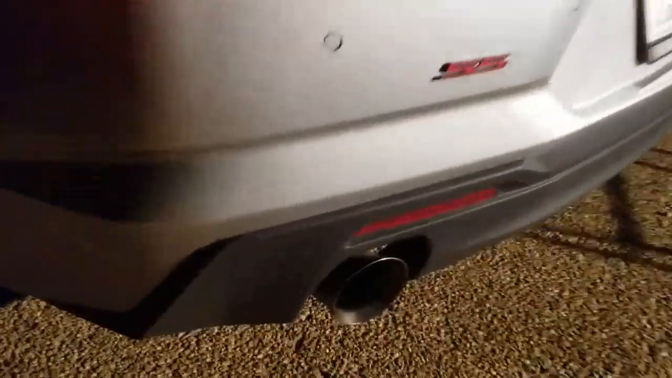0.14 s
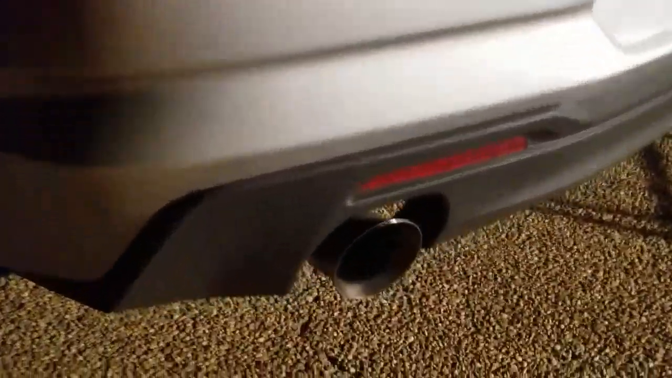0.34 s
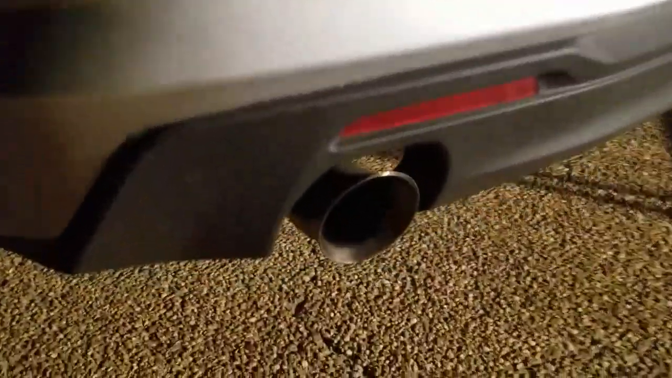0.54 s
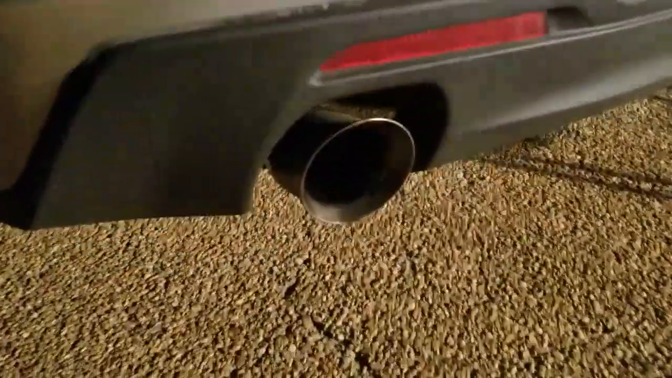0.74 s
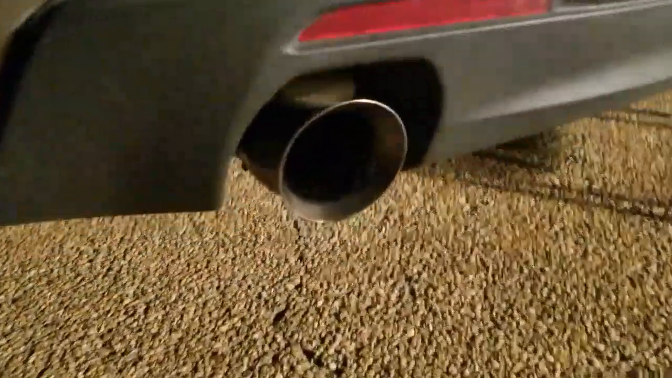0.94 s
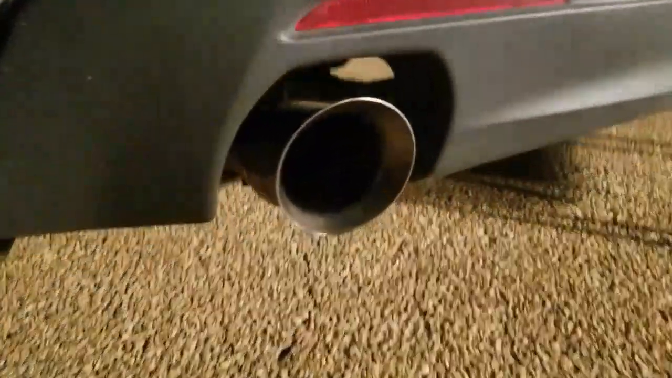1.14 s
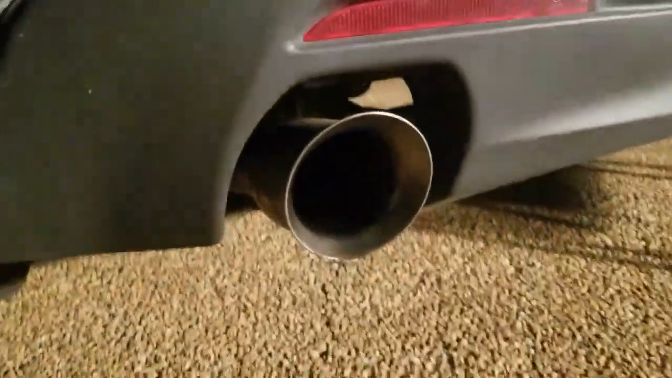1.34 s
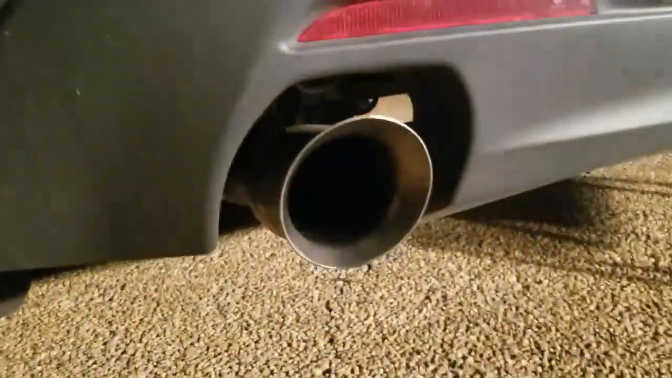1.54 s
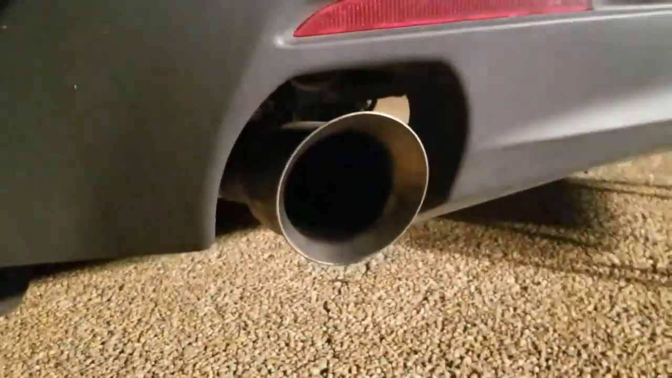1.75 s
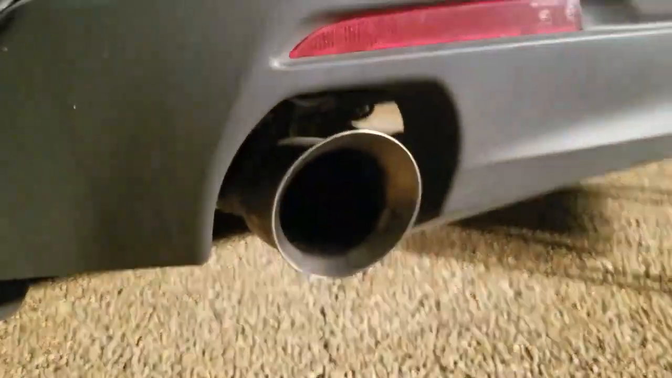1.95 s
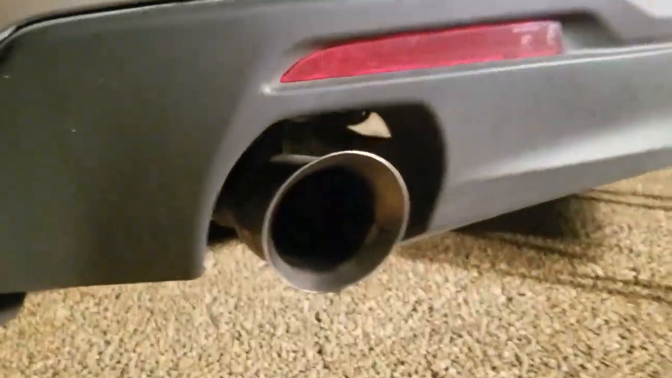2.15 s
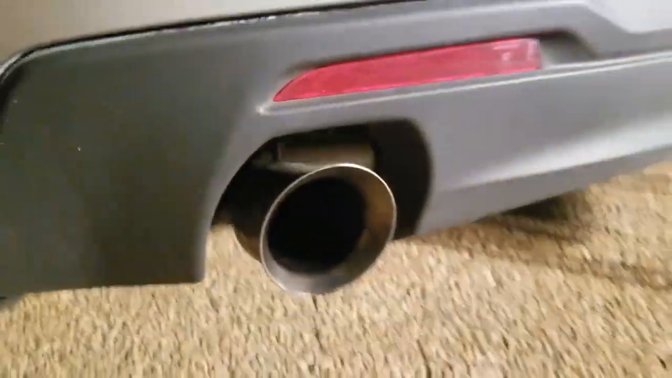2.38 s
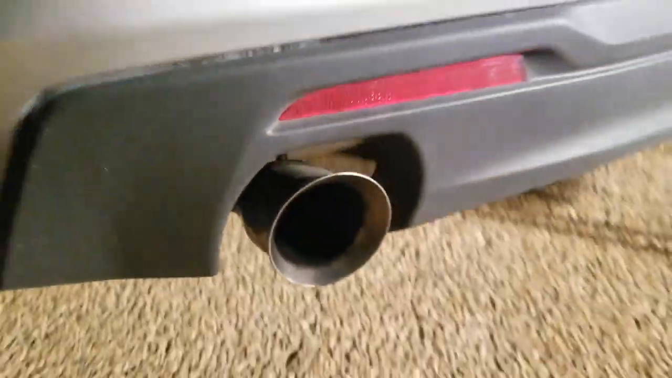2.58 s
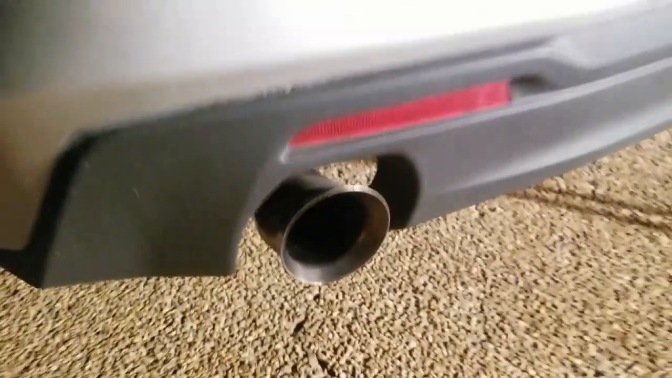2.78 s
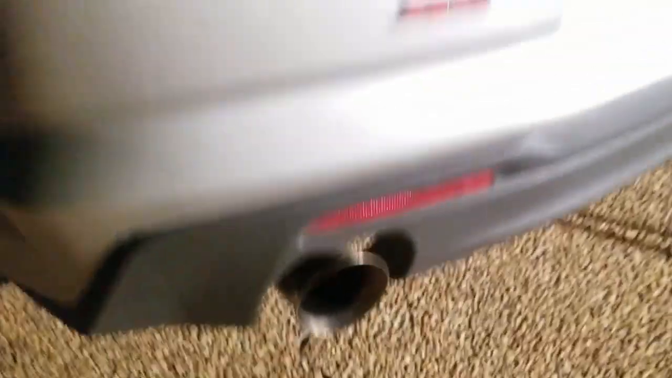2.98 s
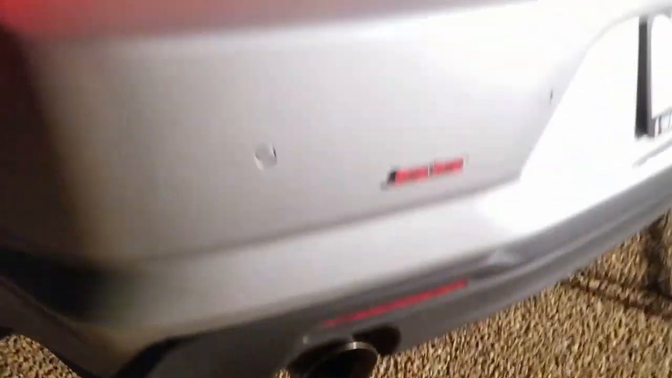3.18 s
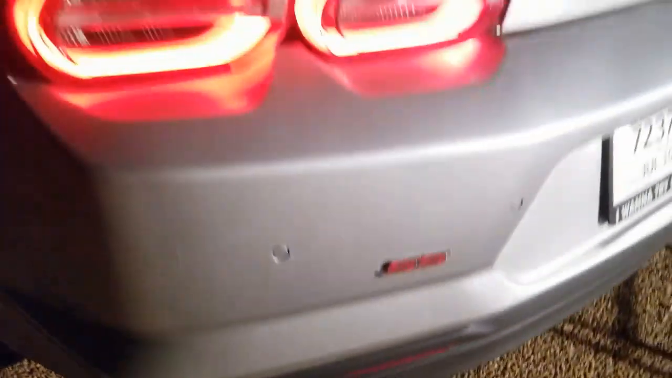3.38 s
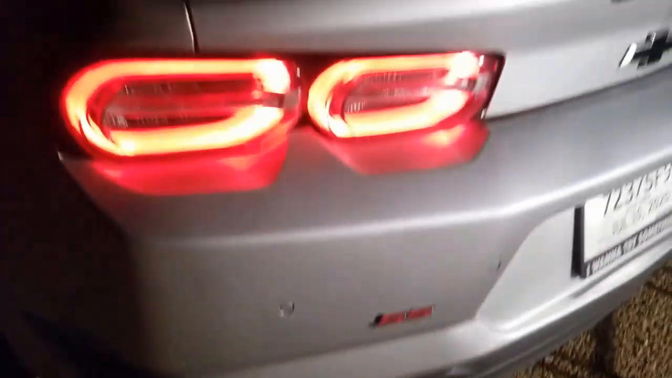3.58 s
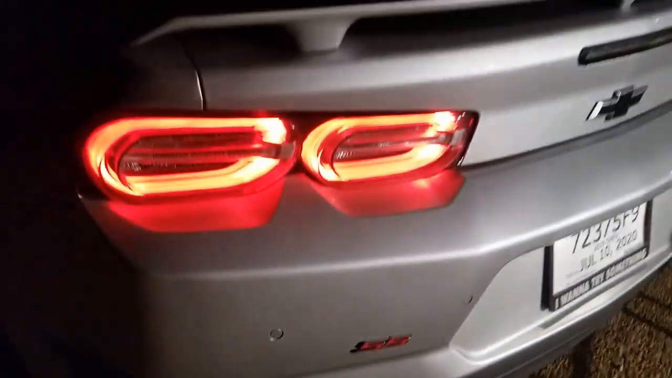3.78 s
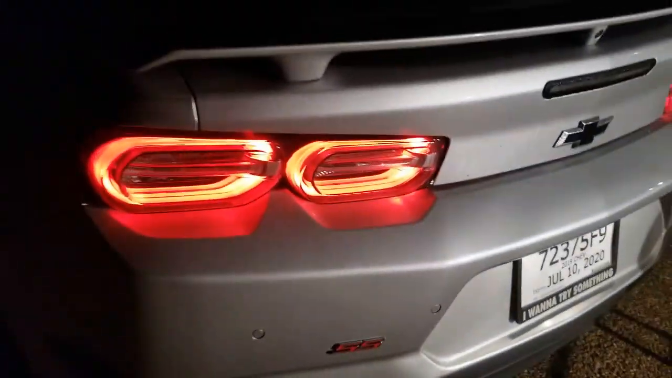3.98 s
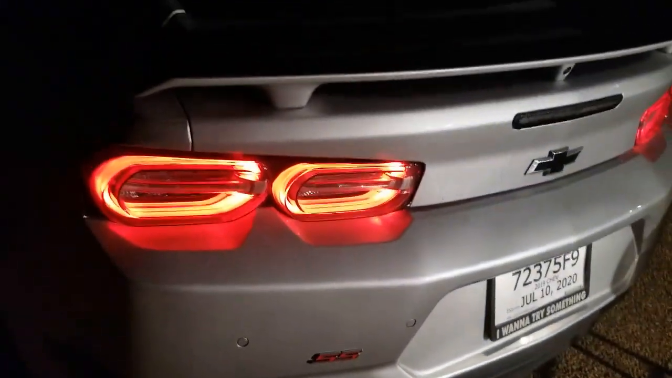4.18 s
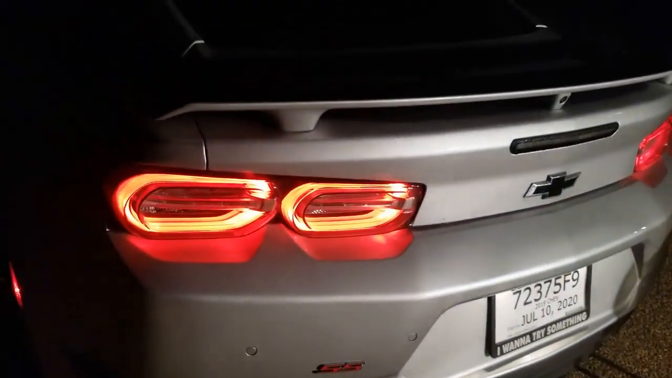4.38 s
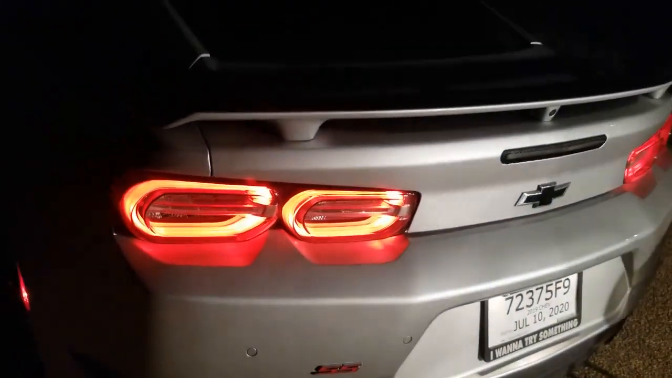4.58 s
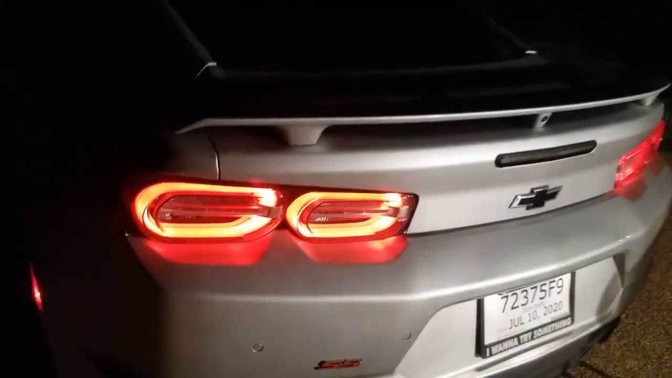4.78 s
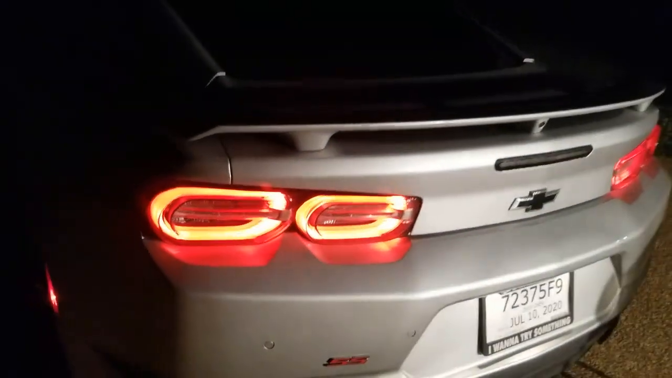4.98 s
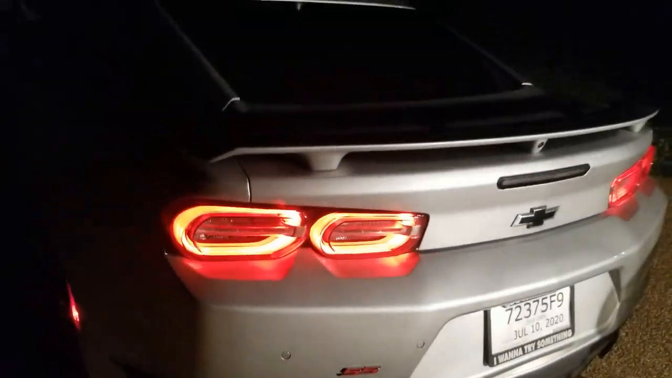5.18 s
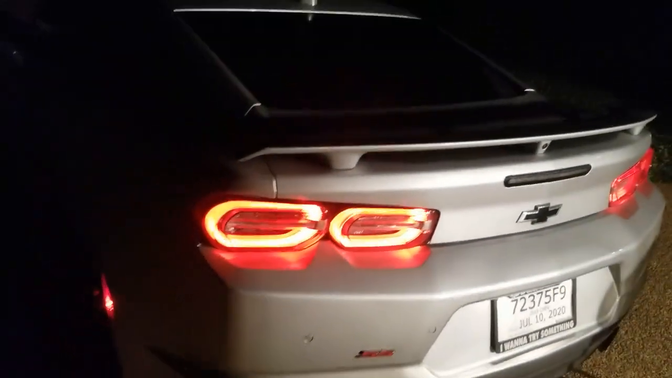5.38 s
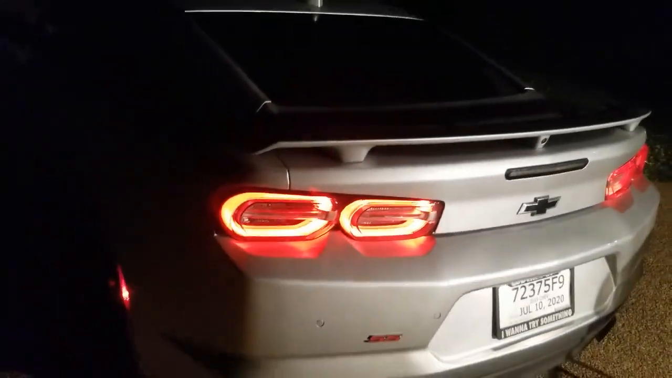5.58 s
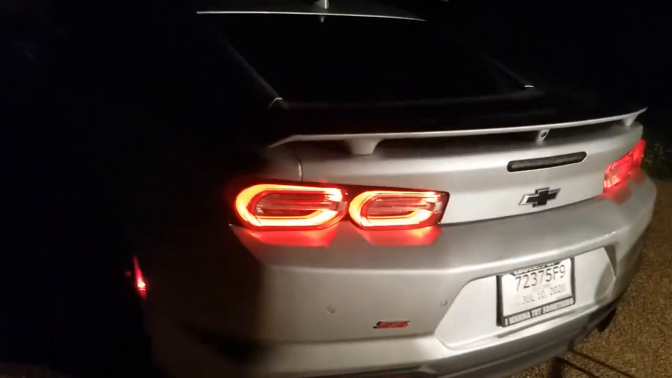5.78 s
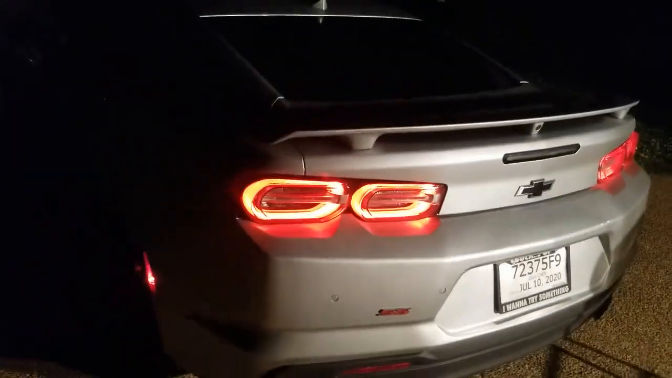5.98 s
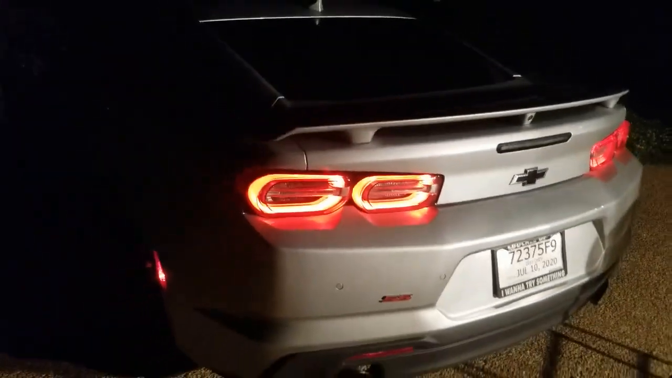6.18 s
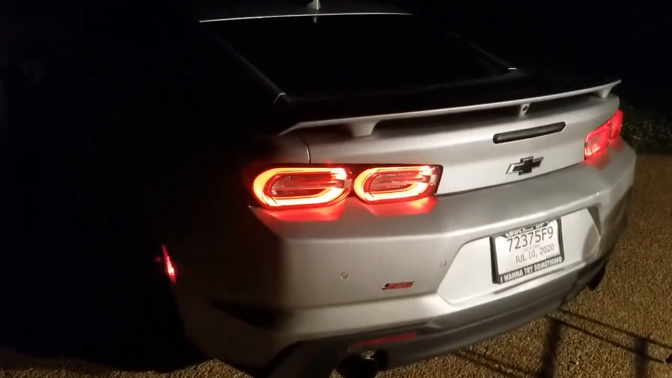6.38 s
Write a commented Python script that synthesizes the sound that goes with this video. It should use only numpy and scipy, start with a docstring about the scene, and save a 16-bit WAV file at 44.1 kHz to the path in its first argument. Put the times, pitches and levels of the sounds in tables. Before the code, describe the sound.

From 0 s a large eight-cylinder engine is already idling outdoors, its exhaust a deep, steady drone around 60 Hz with a lumpy, uneven lope. The microphone closes in on one tailpipe, and from about 0.5 to 2 s the sound is at its fullest: thick bass, burbling pipe tone, raspy puffs, fast light clatter and a fine high hiss pulsing with the firings. Two tiny dry ticks come just after 2 s. From about 2.2 to 3.5 s the microphone pulls back; hiss and burble recede and the ground reflection subtly sweeps the tone. From 3.5 to 6.4 s the rumble continues softer and slower, sinking toward 46 Hz, with muted midrange clatter. Around 5.6 s a soft hand scuff and a tick slightly change the treble colour, followed by very faint ticks. Low outdoor air lies underneath; the engine never revs or stops.

```python
"""A deep, loping drone comes first: a V8 idles outdoors and slowly settles from a fast idle.
The microphone closes in on one tailpipe, then backs away from it.
Harmonics of the firing rate make the drone, unequal cylinders the lope, and turbulent puffs rasp in the pipe.
Noise surging twice a firing hisses at the tip, noise bursts and resonances clatter in step, asphalt echoes
the engine, and short noise decays make a few sharp ticks and a soft scuff over the outdoor air."""
import sys
import numpy as np
from scipy import signal
from scipy.fft import rfft, irfft
from scipy.io import wavfile

SR = 44100
rng = np.random.default_rng(int(sys.argv[2]) if len(sys.argv) > 2 else 0)


def dump(signal):
    """Clip the signal to [-1, 1] and save it as 16-bit WAV at the path in sys.argv[1]."""
    limited = np.clip(np.atleast_2d(signal).T, -1, 1)
    pcm = np.round(limited * 32767).astype(np.int16)
    wavfile.write(sys.argv[1], SR, pcm)


N = 283783  # samples

SCUFF_S = 5.574  # moment of the hand's shift of grip, s


def amp(db):
    """A level in decibels is twenty times the logarithm of the amplitude ratio returned."""
    return 10 ** (np.asarray(db) / 20)


def evened(x):
    """Division by the root mean square gives every signal the same mean power, rms 1."""
    return x / np.sqrt(np.mean(x ** 2) + 1e-20)


def curves(rows):
    """Linear interpolation turns each column of a time table into a sample-by-sample course."""
    s, *columns = np.transpose(rows)
    return [np.interp(np.arange(N) / SR, s, column) for column in columns]


def read(points, hz):
    """A spectrum is interpolated on a logarithmic frequency axis, as pitch is heard."""
    f, value = np.transpose(points)
    return np.interp(np.log(hz + 1), np.log(f + 1), value)


def colour(x, points, size=8192):
    """Minimum-phase filtering: the Hilbert relation of gain and phase makes the response causal."""
    log_gain = np.log(amp(read(points, abs(np.fft.fftfreq(size, 1 / SR)))))
    response = np.exp(np.conj(signal.hilbert(log_gain)))
    taps = np.fft.ifft(response).real[:size // 2]
    return signal.oaconvolve(np.atleast_2d(x), taps[None], axes=1)[:, :N]


def ring(x, hz, width_hz):
    """Two equal resonators in cascade, each width_hz wide, give a peak with steep skirts."""
    b, a = signal.iirpeak(hz, hz / width_hz, SR)
    return signal.lfilter(b, a, signal.lfilter(b, a, x))


def waver(hz):
    """Gaussian low-pass filtering of white noise leaves a slow random fluctuation of rms 1."""
    f = np.fft.rfftfreq(N, 1 / SR)
    spectrum = rfft(rng.standard_normal(N)) * np.exp(-(f / hz) ** 2)
    return evened(irfft(spectrum, N))


def ports(pair):
    """Partial coherence: two unrelated signals become a left and right alike in the bass, apart in the treble."""
    # likeness of the two ports, held within 0-1 below: f/Hz, coherence
    likeness = [(600, 0.84), (900, 0.6), (1300, 0.7), (2400, 0.1), (4500, 0), (9000, 0.16), (15000, -0.27)]
    # balance of the two ports: f/Hz, left minus right level/dB
    tilt = [(60, 34), (380, 4.5), (700, -2.5), (1290, -7.5), (2380, -15), (4400, -11.5), (8500, -17),
            (10800, -5.5), (12000, 0.5), (14500, 12)]
    hz = np.fft.rfftfreq(N, 1 / SR)
    a, b = rfft(evened(pair))
    same = np.clip(read(likeness, hz), 0, 1)
    lean = amp(read(tilt, hz) / 2)
    mid = np.sqrt(lean ** 2 + lean ** -2 + 2 * same) / 2
    left = a * lean
    right = (same * a + np.sqrt(1 - same ** 2) * b) / lean
    return irfft(np.array([left, right]) / mid, N)


def firings(crank, lag, size):
    """An impulse train: one impulse a firing, at its crank angle plus a lag in firing intervals."""
    at = np.interp(np.arange(len(size)) + lag, crank, np.arange(N), left=-1, right=-1)
    inside = at >= 0
    return np.bincount(at[inside].astype(int), size[inside], N)


def bursts(crank, lag, level_db, rise_s, fall_s, steady):
    """Amplitude modulation: two channels of noise flare at each firing over a steady share."""
    t = np.arange(SR // 10) / SR
    envelope = (1 - np.exp(-t / rise_s)) * np.exp(-t / fall_s)
    flare = signal.oaconvolve(firings(crank, lag, amp(level_db)), envelope)[:N]
    return (steady + evened(flare)) * rng.standard_normal((2, N))


def drone(crank, away, levels_db, lead=0.405, far_lead=0.29, skew=0.115, flutter=0.071):
    """Fourier synthesis: the firing tone and its harmonics, their phases skewed most close to the tip."""
    total = 0
    for k, db in enumerate(levels_db, 1):
        cycles = k * (crank + lead) + far_lead * away + skew * (k - 1) ** 2 * (1 - away)
        total = total + amp(db) * (1 + flutter * waver(23)) * np.cos(2 * np.pi * cycles)
    return np.sqrt(2) * total


def boom(firing_hz, boom_hz=55.55, width_hz=5.4):
    """Resonance: the firing tone loses level as its frequency departs from the exhaust's resonance."""
    return -20 * np.log10(1 + ((firing_hz - boom_hz) / width_hz) ** 2)


def lope(crank, lag, push, pipe):
    """Subharmonics: unequal cylinders thump the pipe in a pattern that repeats every two revolutions."""
    thumps = firings(crank, lag, evened(push) + .22 * rng.standard_normal(len(push)))
    for multiple in range(1, 5):
        turn = np.exp(2j * np.pi * multiple * crank)  # the even share of the thumps belongs to the drone
        thumps = thumps - 2 * (turn * np.mean(thumps / turn)).real
    rough_thumps = evened(thumps) + .2 * rng.standard_normal(N)
    return evened(colour(rough_thumps, pipe))


def burble(crank, lag, cylinder_db, scatter_db=2.5, muffler_hz=400):
    """Standing waves of the tailpipe are excited by each firing, low-passed by the muffler."""
    # standing waves of the tailpipe: f/Hz, width/Hz, relative level/dB
    standing = [(262.1, 12, 0.5), (285, 8.4, 1.5), (307.7, 27, 0)]
    kick_db = cylinder_db + scatter_db * rng.standard_normal(len(lag))
    kicks = firings(crank, lag, amp(kick_db))
    kicks = signal.sosfilt(signal.butter(4, muffler_hz, fs=SR, output="sos"), kicks)
    total = np.zeros(N)
    for hz, width_hz, db in standing:
        b, a = signal.iirpeak(hz, hz / width_hz, SR)
        total += amp(db) * signal.lfilter(b, a, kicks)
    return evened(total)


def rasp(crank, cylinder_db, rasp_db, low_db, high_db, scatter_db=-0.4):
    """Turbulence: each puff is a burst of noise that sets two pipe resonances ringing."""
    # spectrum of the turbulent puffs: f/Hz, relative level/dB
    puff_spectrum = [(120, -31), (230, 5.5), (335, 4), (400, -0.5), (440, -10.5), (475, 2.5), (548, -13.5),
                     (600, -4), (710, 1), (800, -8), (1000, -10), (1090, -20.5), (1500, -37.5), (3000, -54)]
    puff_db = cylinder_db + scatter_db * rng.standard_normal(len(cylinder_db))
    puffs = bursts(crank, lag=-0.24, level_db=puff_db, rise_s=0.00083, fall_s=0.0075, steady=0.3)
    body = amp(rasp_db) * ports(colour(puffs, puff_spectrum))
    low = amp(low_db) * ports(ring(puffs, hz=580, width_hz=26.7))
    high = amp(high_db) * ports(ring(puffs, hz=945, width_hz=129))
    return body + low + high


def clatter(crank, cylinder_db, away, wash_db=-1.9, knock_db=-3.5, scatter_db=8.0):
    """Impact excitation: a bright burst for each cylinder, and engine parts that ring by varying amounts."""
    # spectra of the bursts heard near and far: f/Hz, relative level/dB
    near_spectrum = [(650, -27), (1100, -11), (1230, 7.5), (1330, 4), (1440, 3), (1560, 0.5), (2100, -10.5),
                     (2470, -17), (2770, -36.5), (3620, -19), (4240, -15), (5240, -68.5), (6000, -43.5),
                     (7800, -57.5), (13200, -120)]
    far_spectrum = [(650, -39), (1100, 8.5), (1230, 12.5), (1550, -10.5), (1820, -1), (2110, -3),
                    (2330, -8), (2620, -7.5), (2910, -50), (3600, -60), (4610, -57.5), (5020, -54),
                    (6000, -52.5), (7800, -78.5), (13200, -120)]
    # resonances of the ringing parts: f/Hz, width/Hz, relative level/dB
    part_modes = [(1198, 98, -4), (1399, 110, -9), (1814, 470, -8), (2203, 310, -13), (2495, 240, -15)]
    blows = bursts(crank, lag=-0.095, level_db=cylinder_db, rise_s=0.00091, fall_s=0.0026, steady=1.0)
    wash = (1 - away) * ports(colour(blows, near_spectrum)) + away * ports(colour(blows, far_spectrum))
    knocks = np.zeros((2, N))
    for hz, width_hz, db in part_modes:
        scatter = np.clip(rng.standard_normal(len(cylinder_db)), -2, 2)
        blow_db = cylinder_db + scatter_db * scatter
        strikes = bursts(crank, lag=-0.045, level_db=blow_db, rise_s=0.00081, fall_s=0.012, steady=0.15)
        knocks += amp(db) * evened(ring(strikes, hz, width_hz))
    return amp(wash_db) * wash + amp(knock_db) * ports(knocks)


def asphalt(x):
    """Interference: direct sound and a delayed ground echo form a comb of peaks and dips that sweeps."""
    # lag of the echo as the microphone moves: t/s, lag/ms
    bounce = [(0, 1.48), (.45, 1.5), (1.15, 1.17), (2.15, 1.08), (3.05, 1.89), (3.5, 1.58), (4.25, 1.15),
              (5.1, 1.05), (6.43, 1.26)]
    # reflection from rough asphalt: f/Hz, level/dB
    ground = [(200, -8), (500, -8.5), (1100, -13), (3000, -15)]
    n, (lag_ms,) = np.arange(N), curves(bounce)
    sent = n - lag_ms * SR / 1000
    echo = [np.interp(sent, n, channel) for channel in x]
    return x + colour(echo, ground)


def hiss(crank, lag=0.29, surge_db=2.0, flicker_db=1.48):
    """Jet noise: gas hisses past the rim of the tip, once going out and once coming back at each firing."""
    # spectrum of the hiss: f/Hz, relative level/dB
    hiss_spectrum = [(1760, -52), (3000, -16.5), (3590, -11), (4170, -16), (4760, -19.5), (5570, -25.5),
                     (6710, -18.5), (8960, -13), (11600, -1.5), (13400, 1), (14100, -1.5), (15500, -6)]
    swing_db = surge_db * np.cos(2 * np.pi * 2 * (crank - lag))
    gas = amp(swing_db + flicker_db * waver(51)) * rng.standard_normal((2, N))
    return ports(colour(gas, hiss_spectrum))


def ticks(fall_s=0.0013, gain_db=-1):
    """Transients: abrupt noise with exponential decay makes tiny dry snaps, perhaps of hot metal or grit."""
    # the snaps: t/s, relative level/dB
    snaps = [(2.0088, -28), (2.056, -24.5), (5.5754, -25.5), (5.78, -38), (6.2133, -42), (6.3744, -43)]
    # spectrum of a snap: f/Hz, relative level/dB
    snap_spectrum = [(800, -17), (2700, 0), (4500, -7), (7000, -11), (8700, -6.5), (12000, 12), (15500, -2)]
    t, envelope = np.arange(N) / SR, np.zeros((2, N))
    for s, db in snaps:
        envelope += amp(db) * (t >= s) * np.exp(-abs(t - s) / fall_s)
    return amp(gain_db) * colour(envelope * rng.standard_normal((2, N)), snap_spectrum)


def scuff(length_s=0.042, db=-47):
    """Friction noise: a hand shifting its grip makes a soft scuff that swells and dies exponentially."""
    # spectrum of the scuff: f/Hz, relative level/dB
    scuff_spectrum = [(800, -1), (2700, 8), (4500, -9), (7000, -13), (9500, 6), (15500, -13)]
    swell = np.exp(-abs(np.arange(N) / SR - SCUFF_S) / length_s)
    return amp(db) * swell * evened(colour(rng.standard_normal((2, N)), scuff_spectrum))


def outdoor_air(db=-45.5):
    """Ambient noise: stationary random pressure, weighted to the bass, lies under everything."""
    # spectrum of the outdoor background: f/Hz, relative level/dB
    air_spectrum = [(15, -3), (40, -1.5), (100, 4.5), (400, 1.5), (1500, -35), (5000, -86), (15000, -49.5)]
    return amp(db) * ports(colour(rng.standard_normal((2, N)), air_spectrum))


def part_levels(distance, rpm, reference_rpm=830):
    """Source strength and spreading: each part's level in dB follows engine speed and distance."""
    # parts by name: level at the tip/dB, change at full distance/dB, change per 100 rpm/dB
    strengths = { "firing tone": (-14.5, -4.5, 2.8), "2nd harmonic": (-18, -6, 2.74),
                 "3rd harmonic": (-34, .5, 2.7), "4th harmonic": (-25.5, -14.5, 1.7),
                 "lope": (-20.5, -3.5, 2.45), "burble": (-24.5, -14.5, 1.5), "rasp": (-31.5, -2.2, 5.36),
                 "low ring": (-41, -4.5, 8.1), "high ring": (-38, -10, -0.12),
                 "clatter": (-47.4, -4.5, 1.6), "hiss": (-41.5, -15, -0.24)}
    return {part: tip_db + far_db * distance + speed_db * (rpm - reference_rpm) / 100
            for part, (tip_db, far_db, speed_db) in strengths.items()}


def scene():
    """Synchrony: the crank angle, counted in firings, times every engine part; speed and distance set levels."""
    # engine speed: t/s, speed/rpm
    speed = [(0.0, 887.2), (0.4, 873.9), (0.8, 849.9), (1.21, 840.4), (1.61, 825.5), (2.01, 815.0),
             (2.41, 803.7), (2.81, 791.8), (3.22, 791.5), (3.62, 775.0), (4.02, 747.3), (4.42, 729.8),
             (4.82, 723.1), (5.22, 709.2), (5.63, 707.2), (6.03, 685.2), (6.43, 684.0)]
    # microphone from the tailpipe: t/s, distance (0 at the tip, 1 well behind the car)
    path = [(0, 0.49), (.5, 0.14), (1.45, .02), (2.05, 0.15), (2.7, 0.42), (3.55, 1), (4.4, 0.9),
            (6.43, 0.83)]
    # cylinders in firing order: lag/firing intervals, relative push heard near, the same heard far,
    # rasp relative level/dB, clatter relative level/dB
    cylinders = [(-0.178, 0.022, 0.27, 7, 13.5), (0, 0.066, -0.1, 4.5, 11.5), (0.261, 1, 0.25, 3.5, 16),
                 (0.137, -0.53, -0.3, 2.5, 7.5), (0.127, -0.71, 0.092, 7, 12),
                 (.02, -0.074, 0.088, 0.5, 12.5), (0.0955, -0.99, -0.27, -1, 8),
                 (0.047, -0.49, 0.16, 3.5, 10.5)]
    # exhaust response to the thumps, heard near and far: f/Hz, relative level/dB
    pipe_near = [(30, -35), (60, -47), (85, -14.5), (110, -19), (135, -8.5), (165, -8), (192, -25.5),
                 (220, -19.5), (290, -24), (335, -27.5), (400, -57.5), (600, -38), (1500, -109)]
    pipe_far = [(30, -69), (60, -26.5), (85, -27), (110, -14), (135, -15.5), (165, -10.5), (192, -47.5),
                (220, -18), (290, -42), (335, -41.5), (400, -56.5), (600, -56.5), (1500, -109)]

    (rpm,), (distance,) = curves(speed), curves(path)
    near_zone, far_zone = 0.33, 1  # distances between which near colour gives way to far
    away = np.clip((distance - near_zone) / (far_zone - near_zone), 0, 1)
    db = part_levels(distance, rpm)

    firing_hz = rpm * 4 / 60  # four firings a revolution
    crank = np.cumsum(firing_hz) / SR - .487
    crank = crank + 0.013 * waver(20)  # uneven burning jostles the crank
    order = np.arange(int(crank[-1]) + 1) % len(cylinders)
    lag, near_push, far_push, puff_db, blow_db = np.array(cylinders)[order].T

    harmonics_db = (db["firing tone"] + boom(firing_hz),
                    db["2nd harmonic"], db["3rd harmonic"], db["4th harmonic"])
    bass = drone(crank, away, harmonics_db)
    uneven = (1 - away) * lope(crank, lag, near_push, pipe_near) + away * lope(crank, lag, far_push, pipe_far)
    bass = bass + amp(db["lope"]) * uneven
    bass = bass + amp(db["burble"]) * burble(crank, lag, puff_db)
    # the bass reaches the right port a few samples later
    late = np.interp(np.arange(N) - (2.5 - 0.6 * away), np.arange(N), bass[0])

    engine = np.vstack([bass, late]) * amp([[-.2], [.2]])
    engine = engine + rasp(crank, puff_db, db["rasp"], db["low ring"], db["high ring"])
    engine = engine + amp(db["clatter"]) * clatter(crank, blow_db, away)
    tip_gas = amp(db["hiss"]) * hiss(crank)
    return asphalt(engine) + tip_gas + ticks() + scuff() + outdoor_air()


def record(dry, regrip_s=0.13, edge_hz=15750):
    """Linear filtering: the shifted grip recolours the microphone, then a low-pass limits the band."""
    # microphone response after the shift of grip, relative to before: f/Hz, level/dB
    regrip = [(700, -0.5), (1050, 1.5), (1400, -2), (2200, -2.5), (2900, -11.5), (4000, -1.5), (5400, 4),
              (8000, -1.5), (10000, -1.5), (14000, 1.5)]
    shifted = np.clip((np.arange(N) / SR - SCUFF_S) / regrip_s, 0, 1)
    heard = (1 - shifted) * dry + shifted * colour(dry, regrip)
    low_pass = signal.firwin(511, edge_hz, window=("kaiser", 9), fs=SR)
    return signal.oaconvolve(heard, low_pass[None], "same")


dry = scene()
out = record(dry)
dump(out)
```